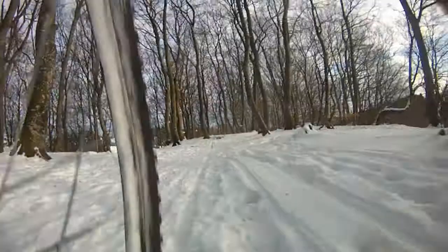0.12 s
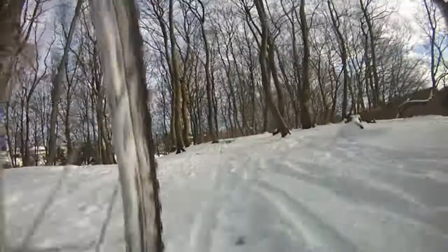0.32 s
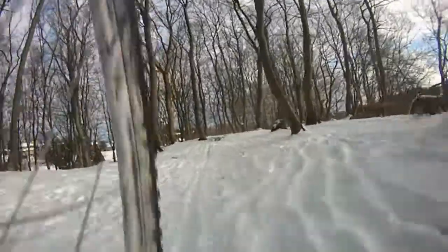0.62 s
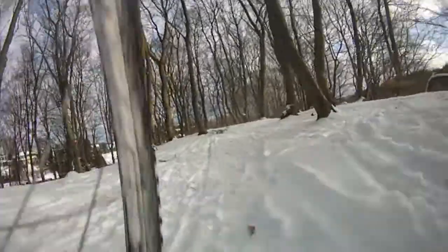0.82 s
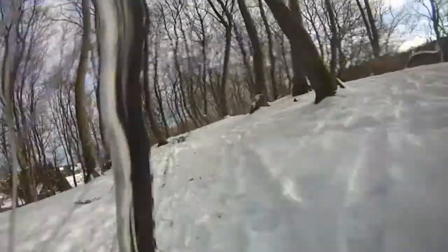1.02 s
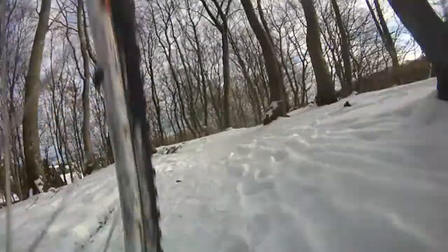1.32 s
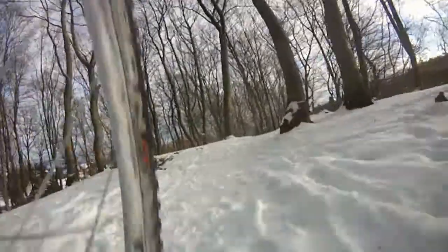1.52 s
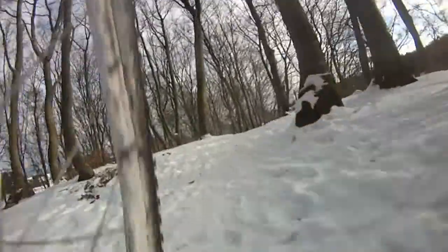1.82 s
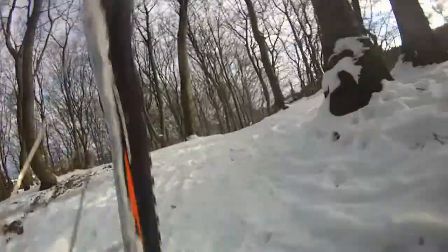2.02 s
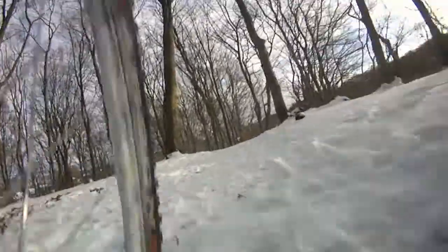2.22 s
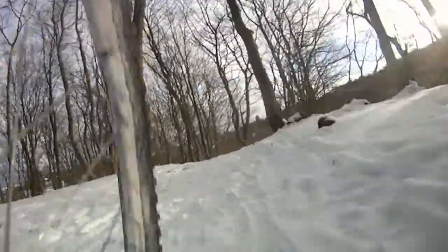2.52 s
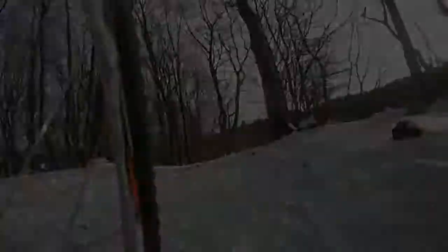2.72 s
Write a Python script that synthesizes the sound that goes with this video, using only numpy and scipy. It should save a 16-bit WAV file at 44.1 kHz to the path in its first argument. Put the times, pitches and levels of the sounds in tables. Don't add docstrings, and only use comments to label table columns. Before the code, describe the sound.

A bicycle rumbles over crusty snow, heard from a camera clamped to its frame: after a brief faint low hiss, tyre roar, crunching crust, hollow knocks, bright rattles and overloaded thuds, then a fade.

```python
import sys
import numpy as np
from scipy import signal
from scipy.io import wavfile
from scipy.ndimage import uniform_filter1d

SR = 44100
rng = np.random.default_rng(int(sys.argv[2]) if len(sys.argv) > 2 else 0)


def undo_db(level):
    steps = np.asarray(level, float) / 20
    return 10 ** steps


def bounce(signal):
    frames = np.transpose(np.atleast_2d(signal))
    limited = np.clip(frames, -1, 1)
    pcm = np.round(limited * 32767).astype(np.int16)
    wavfile.write(sys.argv[1], SR, pcm)


N = 127890

# pitch_hz, level_db_per_hz
OPENING_COLOUR = [(18, -68), (30, -34), (97, -4.5), (156, -14.5), (767, -27.5), (1360, -33), (2070, -41.5),
                  (4310, -45.5), (15500, -52.5)]
# start_s, peak_db, push_s
THUDS = [
    (.006, -36, .004),
    (.6915, -27, .002),
    (.718, -30, .0015),
    (1.012, -22, .0035),
    (1.0215, -25, .002),
    (1.1545, -23, .0015),
    (1.158, -13, .0018),
    (1.1665, -24, .0015),
    (1.8455, -26, .0015),
    (2.1095, -24, .002),
]
# start_s, peak_db, rise_s, sign
SNAPS = [
    (2.586, -19, .0002, -1),
    (2.5861, -28, .00004, -1),
    (.8533, -25, .00005, -1),
    (2.1123, -23, .00007, -1),
    (.7187, -25, .00006, 1),
    (.8343, -29, .0001, 1),
]
# start_s, peak_db
KNOCKS = [(0.182, -43), (0.348, -29.5), (0.422, -28), (0.494, -33), (0.551, -45), (0.663, -44),
          (0.692, -30), (0.717, -27), (0.832, -34), (0.852, -45), (0.953, -32), (1.002, -35), (1.014, -29),
          (1.057, -49), (1.088, -34), (1.113, -24), (1.243, -34), (1.41, -28), (1.423, -27), (1.459, -37.5),
          (1.693, -30), (1.74, -40), (1.765, -29.5), (1.807, -29.5), (2.04, -37), (2.109, -27),
          (2.127, -30), (2.366, -32.5)]
# pitch_hz, width_hz, level_db
KNOCK_MODES = [(490, 130, 0), (800, 215, -7.5), (1060, 180, -19.5)]
# start_s, level_db, crunch_db (relative to level_db)
RIDE = [(.2, -40, 9), (.33, -36.5, 14.5), (.45, -36, -5), (.58, -33.5, 12), (.8, -38, 6.5), (1.0, -33, 9),
        (1.25, -38.5, 8), (1.449, -35.5, 12.5), (1.6, -39.5, 4.5), (1.72, -38, 17), (1.85, -36.5, 12),
        (1.95, -43.5, 9), (2.05, -34.5, 10), (2.19, -39.5, -3.5), (2.281, -36, 6), (2.38, -33, 5.5),
        (2.6, -40, 7.5), (2.9, -33.5, 7)]
# pitch_hz, width_hz, level_db
FRAME_MODES = [(157.2, 35.5, -3), (193.2, 65.4, 0.5), (265.5, 49, -5.5), (295.3, 23.7, -7),
               (485.7, 68, -10.5), (765, 21, -18.5), (1126, 170, -20), (1570, 230, -29), (1947, 160, -24.5),
               (2372, 110, -26), (2424, 310, -29.5)]
# pitch_hz, level_db_per_hz
ROAR_COLOUR = [(20, -16), (45, 3), (101, -3.5), (195, 0.5), (879, -29), (2420, -42), (3100, -43.5),
               (10400, -70.5), (14000, -93.5)]
# pitch_hz, width_hz, level_db
HOUSING_MODES = [(1824, 320, 5.5), (2455, 210, 12.5), (3274, 600, -1), (4070, 400, -4), (4980, 1000, -3.5),
                 (7060, 800, -3), (9300, 1650, -10), (11560, 1900, -14), (14100, 1800, -20.5)]
# start_s, peak_db,
# brightness_db
RATTLES = [(0.2523, -44.5, -12), (0.284, -44, -6.5), (0.2962, -42, -15), (0.3198, -47, -5),
           (0.3226, -51, -12), (0.3317, -34, -23), (0.3494, -58, 0.5), (0.3686, -54.5, 0),
           (0.4165, -49, -3), (0.429, -23.5, -5), (0.4771, -35, -8.5), (0.578, -35.5, -19),
           (0.5893, -44, -2), (0.608, -40.5, -7.5), (0.6262, -49, -5), (0.7181, -29, -11.5),
           (0.7278, -38, -34), (0.8315, -40, -2), (0.9093, -31.5, -26.5), (0.9219, -37.5, -9.5),
           (0.9764, -48, -1), (1.0028, -15.5, -7.5), (1.0171, -30.5, -10), (1.0384, -57.5, -4),
           (1.0907, -29.5, -12.5), (1.1128, -30, -9.5), (1.1388, -40, -24), (1.1482, -21, -6.5),
                  (1.1532, -30, -22), (1.1687, -36, -8), (1.1823, -30, -12), (1.1943, -19.5, -5.5),
                  (1.2435, -33.5, -8), (1.3525, -31, -10.5), (1.3756, -64, 6), (1.4136, -36, -30),
                  (1.4261, -22.5, -8), (1.4664, -37, 2), (1.4718, -34, -14), (1.5193, -32, -11.5),
           (1.7, -42, -10.5), (1.727, -58, -19), (1.7475, -45, -13), (1.7642, -48, -30),
                (1.7743, -42, -23), (1.837, -42, -10.5), (1.8656, -36.5, -32), (1.8857, -34.5, -24),
                (1.8987, -35.5, -9.5), (1.9906, -50.5, -2), (2.0102, -34, -5.5), (2.0159, -28.5, -18),
                (2.0683, -53, -18), (2.085, -44, -27), (2.1032, -48, -14), (2.1117, -37, 0.5),
                (2.1238, -21.5, -10.5), (2.1276, -36.5, -1), (2.1718, -41, -4.5), (2.4389, -38.5, -20),
                (2.5411, -42, -11), (2.5509, -41, -12), (2.5857, -42.5, 3), (2.6579, -38, -17),
           (0.516, -44.5, -18), (0.5557, -46, -6), (0.673, -44, -22), (0.6921, -48, -8),
                 (0.7334, -32.5, -25), (0.783, -48, -19), (0.8104, -41.5, -20), (0.8644, -48, -5),
                 (0.8714, -62, -8), (0.951, -51, -10), (1.0708, -40.5, -22), (1.226, -46, -12),
                 (1.4023, -41, -10), (1.4237, -33, -23), (1.431, -47, -13), (1.4433, -50, -11),
                 (1.4614, -42, 6), (1.508, -42, -24), (1.5264, -39, -16), (1.5384, -54, -19),
                 (1.5656, -62, -15), (1.6529, -47.5, -25), (1.676, -51, -18), (1.7104, -47, -11),
                 (1.7216, -54, -18), (1.7704, -48, -22), (1.8063, -45, -19), (1.827, -51, -19),
                 (1.8434, -47, -18), (1.8794, -50, -17), (1.9333, -51, -14), (2.158, -50, -15),
                 (2.1856, -50, -23), (2.2324, -50, -7), (2.299, -63, -13), (2.4258, -42.5, -32),
                 (2.4535, -44.5, -7), (2.598, -66, -15), (2.6397, -60, -15), (2.643, -59, -29),
                 (2.6851, -62, -4)]
# start_s, peak_db
RUTS = [(0.37, -38), (0.552, -22.5), (0.63, -27), (0.687, -31.5), (0.907, -38), (1.095, -25), (1.238, -26),
        (1.309, -24.5), (1.448, -20), (1.532, -23.5), (1.696, -27), (1.765, -21.5), (1.799, -44),
        (2.018, -25), (2.164, -28), (2.266, -19.5), (2.36, -19.5), (2.426, -27.5)]
# pitch_hz, width_hz, level_db
SWING_MODES = [(173, 13.3, -5), (200.5, 47, 0), (269, 180, -4)]
# start_s, length_s, entry_pop_db, exit_pop_db
BLANKS = [(.3775, .0018, -36, -31), (.602, .006, -22, -23), (1.0165, .0014, -17, -24),
          (1.0967, .0057, -23, -23), (1.15, .0026, -19, -20), (1.1604, .0045, -13, -21),
          (1.1985, .0045, -29, -27), (1.4617, .0014, -25, -24), (1.8472, .0055, -20, -25),
          (2.1128, .003, -19, -22), (2.3285, .0014, -36, -33), (2.4427, .0045, -27, -21),
          (2.548, .0014, -36, -29), (2.5872, .0014, -38, -34)]


def lowpass(x, hz, order):
    return signal.sosfilt(signal.butter(order, hz, "low", fs=SR, output="sos"), x)


def highpass(x, hz, order):
    return signal.sosfilt(signal.butter(order, hz, "high", fs=SR, output="sos"), x)


def rms_one(x):
    return x / np.sqrt(np.mean(x ** 2) + 1e-20)


def drift(rate_hz):
    r = np.exp(-40 * np.pi * rate_hz / SR)
    slow = signal.lfilter([1], [1, -2 * r, r * r], rng.standard_normal(N // 20 + 4002))
    slow = rms_one(slow[4000:])
    return np.interp(np.arange(N) / 20, np.arange(len(slow)), slow)


def resonate(x, hz, width_hz):
    r = np.exp(-np.pi * width_hz / SR)
    top, bottom = [(1 - r * r) / 2, 0, (r * r - 1) / 2], [1, -2 * r * np.cos(2 * np.pi * hz / SR), r * r]
    return signal.lfilter(top, bottom, x + 1e-18)


def grains(per_s, spread_db):
    size = undo_db(spread_db * np.minimum(rng.exponential(1, N), 5)) * rng.choice([-1, 1], N)
    return size * (rng.random(N) < per_s / SR)


def flickering_noise(colour, patchy_db):
    colour_hz, colour_db = np.transpose(colour)
    edges = 21.5 * 2 ** np.arange(0, 9.7, .5)
    white = rng.standard_normal((2, N))
    together = drift(25)
    out = 0
    for k, (low, high) in enumerate(zip(edges, edges[1:])):
        band = signal.sosfilt(signal.butter(2, [low, high], "band", fs=SR, output="sos"), white[k % 2])
        db = np.interp(np.log(np.sqrt(low * high)), np.log(colour_hz), colour_db)
        flicker = .8 * together + .6 * drift(15)
        out = out + band * undo_db(db + patchy_db * flicker)
    return rms_one(out)


def pop(rise_s):
    u = np.arange(800) / SR / rise_s
    return u ** 2 / 4 * np.exp(2 - u)


def strikes(rows, modes, cut_hz):
    start_s, peak_db = np.transpose(rows)
    luck = rng.standard_normal((len(start_s), len(modes)))
    lag = rng.uniform(-1, 1, (len(start_s), len(modes)))
    out = 0
    for k, (hz, width_hz, mode_db) in enumerate(modes):
        at = ((start_s + .003 * np.abs(lag[:, k])) * SR).astype(int)
        blow = np.sign(lag[:, k]) * undo_db(peak_db + mode_db + 2.5 * luck[:, k])
        clicks = np.zeros(N)
        clicks[at] = blow * SR / (2 * np.pi * width_hz)
        out = out + resonate(clicks, hz, width_hz)
    return lowpass(out, cut_hz, order=4)


def housing(dull, bright, air):
    out = 0
    for k, (hz, width_hz, db) in enumerate(HOUSING_MODES):
        drive = dull if hz < 4500 else bright if hz < 8500 else air
        out = out + (-1) ** k * undo_db(db) * resonate(drive, hz, width_hz)
    return out


def earlier_shot():
    return flickering_noise(OPENING_COLOUR, patchy_db=.8)


def thuds():
    push = np.zeros(N)
    for start_s, db, push_s in THUDS:
        i = int(start_s * SR)
        push[i:i + 800] += undo_db(db) * pop(push_s / 2)
    for start_s, db, rise_s, sign in SNAPS:
        i = int(start_s * SR)
        push[i:i + 800] += sign * undo_db(db) * pop(rise_s)
    return highpass(push, 55, order=1)


def crust_knocks():
    return strikes(KNOCKS, KNOCK_MODES, cut_hz=1300)


def rumble(level_db):
    jolts = grains(per_s=1400, spread_db=2.8) * undo_db(1.6 * drift(40))
    loose_db = -39 + 0.84 * (level_db + 39)
    modes = []
    for k, (hz, width_hz, db) in enumerate(FRAME_MODES):
        gain = (-1) ** k * undo_db(db + 1.5 * drift(15)) / np.sqrt(width_hz)
        modes.append(gain * resonate(jolts, hz, width_hz))
    ring_cut_hz = 2800
    low = sum(modes[:4])
    high = lowpass(sum(modes[4:]), ring_cut_hz, order=8)
    ring = (undo_db(level_db) * lowpass(low, ring_cut_hz, order=8) + undo_db(loose_db) * high) / np.std(low)

    spoke_hz = 3450
    spoke = rms_one(resonate(resonate(jolts, spoke_hz, 60), spoke_hz, 300))
    spoke = undo_db(-50 + 6.3 * drift(40)) * spoke

    roar = lowpass(flickering_noise(ROAR_COLOUR, patchy_db=1.3), 12600, order=12)
    roar = lowpass(roar, ring_cut_hz, order=8) + undo_db(-2) * highpass(roar, ring_cut_hz, order=4)
    return undo_db(-3.5) * ring + undo_db(loose_db) * (spoke + undo_db(-2.5) * roar)


def crunch(level_db):
    crumbs = grains(per_s=260 * undo_db(3.3 * drift(8.6)), spread_db=2.6)
    scrape = resonate(np.abs(crumbs), 30, 730) * rng.standard_normal(N)
    rung = housing(scrape, scrape * undo_db(1.1 * drift(40)), scrape * undo_db(5.7 * drift(40)))
    return undo_db(level_db - 46) * rms_one(lowpass(rung, 12600, order=12))


def rattles():
    t = np.arange(400) / SR
    envelope = np.exp(-t / .0008) * np.minimum(t / .00025, 1)
    trains = np.zeros((3, N))
    for start_s, db, bright_db in RATTLES:
        i = int(start_s * SR)
        scrape = rng.standard_normal(400) * envelope
        gains = undo_db(db + np.array([-4, bright_db - 4.5, 2.12 * bright_db - 4.5]))
        for k, alone in enumerate(np.eye(3)[:, :, None]):
            peak = np.abs(housing(*(alone * scrape))).max()
            trains[k, i:i + 400] += gains[k] * scrape / peak
    return highpass(housing(*trains), 1900, order=2)


def rut_swings():
    return strikes(RUTS, SWING_MODES, cut_hz=200)


def side_hiss(level_db):
    hiss = lowpass(highpass(rng.standard_normal(N), 4000, order=2), 11000, order=6)
    return hiss * undo_db(level_db - 51.5 + 6.4 * drift(7.5))


def scene():
    t = np.arange(N) / SR
    start_s, level, extra = np.transpose(RIDE)
    level_db, crunch_db = np.interp(t, start_s, level), np.interp(t, start_s, extra)
    cut = np.clip((t - .205) / .0023, 0, 1)
    before = undo_db(-44.5) * (1 - cut)
    riding = cut * np.clip((2.8995 - t) / .36, 0, 1)
    rattle = rattles()

    mid = before * lowpass(earlier_shot(), 15400, order=12)
    mid = mid + thuds() + crust_knocks()
    mid = mid + (rumble(level_db) + crunch(level_db + crunch_db)) * riding
    mid = mid + rattle + rut_swings()

    side = undo_db(-10.5) * before * highpass(earlier_shot(), 1520, order=1)
    side = side + riding * side_hiss(level_db)
    side = side + undo_db(-25) * highpass(np.roll(rattle, 9), 3000, order=1)
    return np.array([mid + side, mid - side])


def blank_outs(dry):
    gate, edges, skew = np.ones(N), np.zeros(N), np.zeros(N)
    for start_s, length_s, in_db, out_db in BLANKS:
        a, b = int(start_s * SR), int((start_s + length_s) * SR)
        gate[a:b] = 0
        edges[[a, b]] = [-undo_db(in_db), -undo_db(out_db)]
        skew[[a, b]] = [1, -1]
    pops = highpass(np.convolve(edges, pop(.00065 / 2))[:N], 45, order=1)
    apart = undo_db(-35.5) * highpass(np.convolve(skew, pop(.00024 / 2))[:N], 120, order=1)
    return dry * uniform_filter1d(gate, size=15) + pops + apart * [[1], [-1]]


def top_cut(x):
    return signal.sosfilt(signal.butter(12, 16480, fs=SR, output="sos"), x)


def record(dry):
    mix = blank_outs(dry)
    return top_cut(mix)


dry = scene()
out = record(dry)
bounce(out)
```